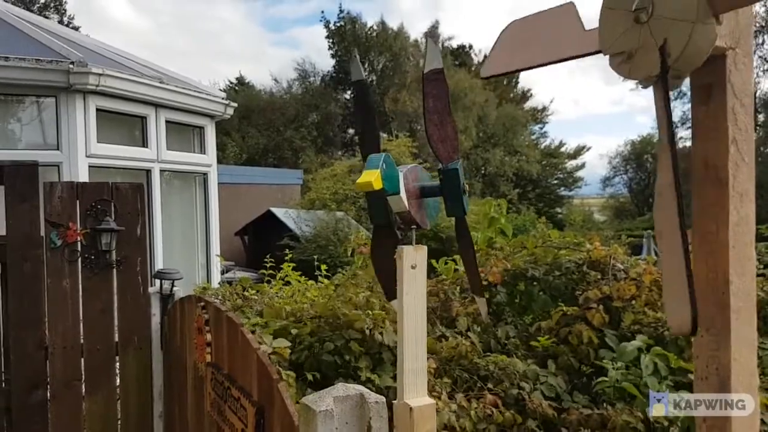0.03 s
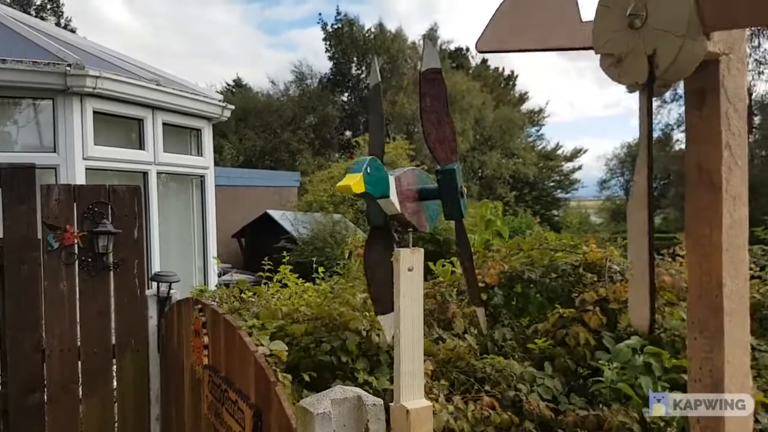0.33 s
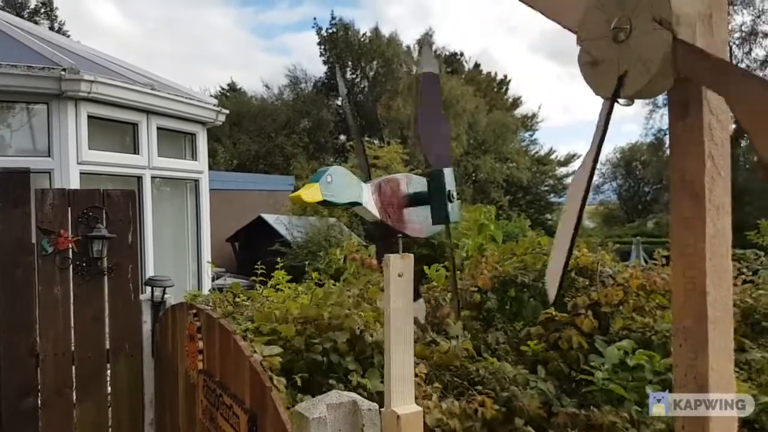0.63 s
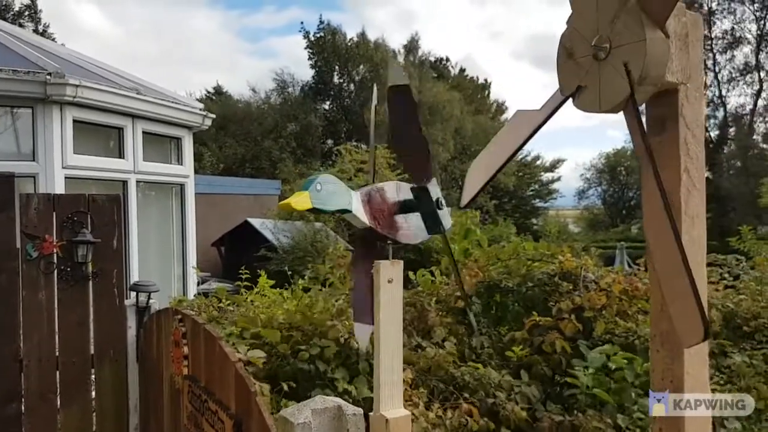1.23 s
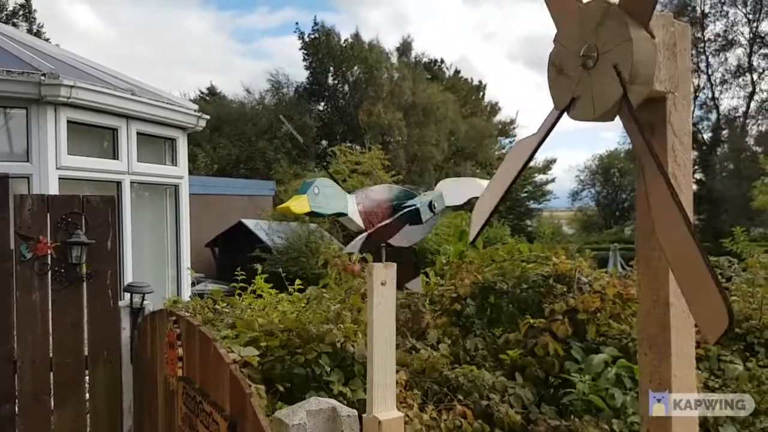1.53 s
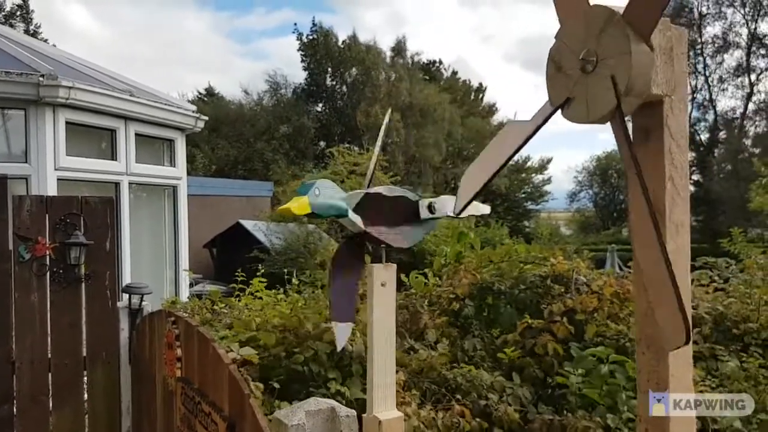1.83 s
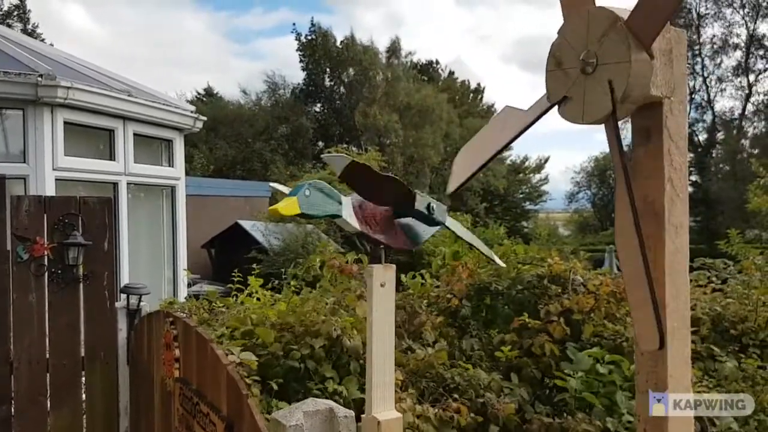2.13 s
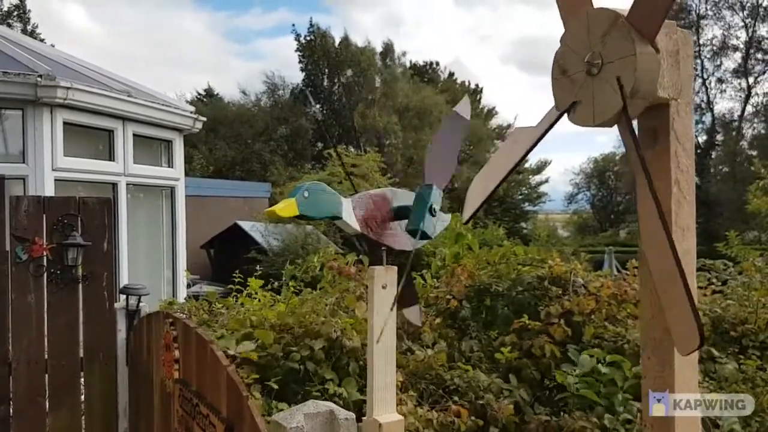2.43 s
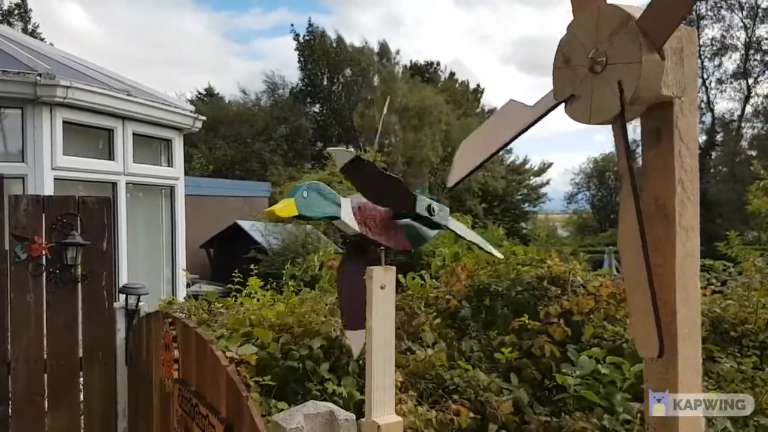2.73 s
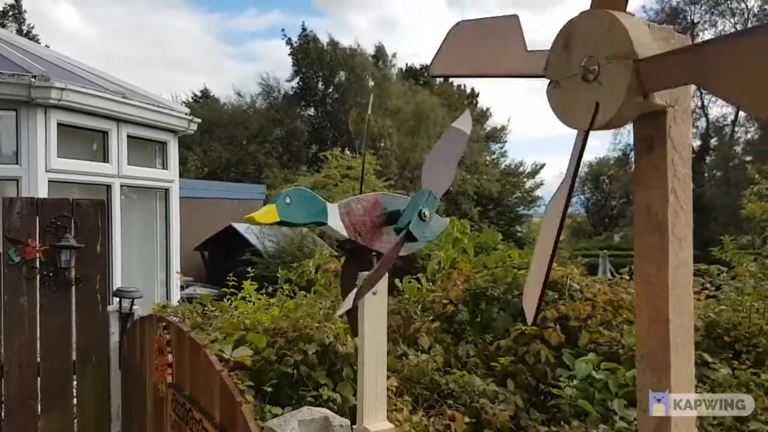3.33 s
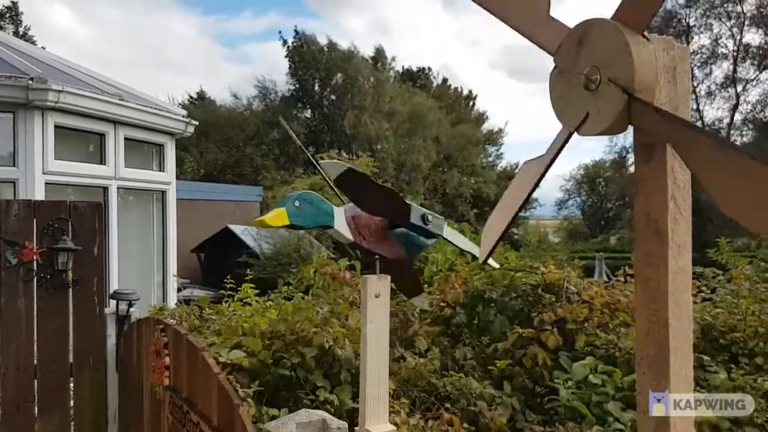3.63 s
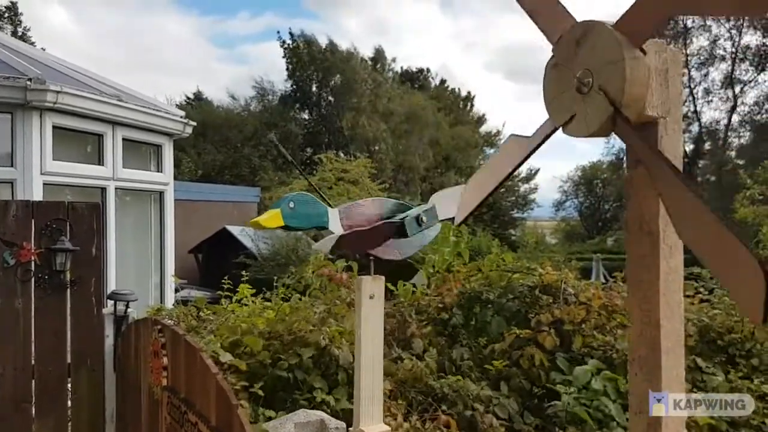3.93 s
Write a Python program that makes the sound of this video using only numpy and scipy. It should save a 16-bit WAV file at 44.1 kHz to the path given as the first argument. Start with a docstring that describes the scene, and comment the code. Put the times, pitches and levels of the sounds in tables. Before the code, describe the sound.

Wind hits an outdoor microphone with a low rumble, dull pops and short crackles, stronger on the left. It eases, gusts again and dies down, while garden leaves hiss quietly and a wooden ornament gives a few faint, uneven ticks.

```python
"""Gusty wind on a microphone

Wind in a garden buffets the two ports (sound openings) of a camera microphone, the left one more.
Each port rumbles and roars on its own, and the exposed left one also flutters and rasps. Single eddies
(swirls of air) thump and pop on both. Leaves hiss behind, and a spinning wooden ornament ticks faintly."""
import sys
import numpy as np
from scipy import signal
from scipy.fft import rfft, irfft, next_fast_len
from scipy.io import wavfile
from scipy.ndimage import map_coordinates

SR = 44100
rng = np.random.default_rng(int(sys.argv[2]) if len(sys.argv) > 2 else 0)


def master_out(mix):
    """Clip the mix to full scale and print it as 16-bit PCM to the path in sys.argv[1]."""
    frames = np.transpose(np.atleast_2d(mix))
    ceiling = np.clip(frames, -1, 1)
    pcm = np.round(ceiling * 32767).astype(np.int16)
    wavfile.write(sys.argv[1], SR, pcm)


N = 4 * SR


def amp(db):
    """Turn decibels into a gain."""
    return 10 ** (np.asarray(db) / 20)


def unit(x):
    """Scale a signal to an average (rms) size of 1."""
    return x / np.sqrt(np.mean(x ** 2) + 1e-20)


def along(points, hz):
    """Read between (pitch_hz, value) rows on a log scale."""
    pitches, values = np.transpose(points)
    return np.interp(np.log(hz + 1), np.log(pitches + 1), values)


def curve(rows):
    """Join (time_s, value) rows into one value per sample."""
    return np.interp(np.arange(N) / SR, *np.transpose(rows))


def wobble(rate_hz):
    """A smooth curve through rate_hz random values a second."""
    knots = rng.standard_normal(4096)
    return map_coordinates(knots, [np.arange(N) * rate_hz / SR], mode="wrap")


def filtered(x, response):
    """Scale each frequency in x by the gain response(hz)."""
    size = next_fast_len(N + SR // 2)
    return irfft(rfft(x, size) * response(np.fft.rfftfreq(size, 1 / SR)), size)[..., :N]


def turbulence(spectrum, lumpy_db, rate_hz):
    """Churning air: noise that comes in random lumps, shaped by a spectrum."""
    flow = rng.standard_normal(N) * amp(lumpy_db * np.tanh(wobble(rate_hz)))
    return unit(filtered(flow, lambda hz: amp(along(spectrum, hz))))


def burst(noise, centre_s, length_s):
    """A bell-shaped burst of noise, of average size 1 at its top."""
    bell = np.exp(-2 * ((np.arange(N) / SR - centre_s) / length_s) ** 2)
    return unit(noise * bell) * np.sqrt(np.mean(bell ** 2))


def foliage():
    """Leaves hiss all around, swelling slowly."""
    # swell of the hiss: time_s, relative_db
    swell = [(0.0, -62.5), (0.56, -60.5), (1.25, -61), (1.73, -63.5), (1.88, -62.5), (2.56, -63.5),
             (3.24, -62.5), (4.0, -63)]
    # tone of the hiss: pitch_hz, level_db
    tone = [(40, 2), (300, 5), (620, 10.5), (850, 7), (1250, 3.3), (1700, 1.6), (2700, .8), (3500, -3),
            (5000, -5.5), (7500, -9), (9200, -16.5), (11500, -14), (15500, -16)]
    # how alike the two ports hear it: pitch_hz, likeness (1 = the same)
    alike = [(200, .6), (1000, .2), (4000, .05), (6000, .35), (8000, .88), (11000, .98)]

    def split(hz):
        angle = np.arccos(np.clip(along(alike, hz), -1, 1)) / 2
        return amp(along(tone, hz)) * [np.cos(angle), np.sin(angle)]

    shared, opposite = filtered(rng.standard_normal((2, N)), split)
    hiss = unit(np.array([shared + opposite, shared - opposite]))
    return hiss * amp(curve(swell) + 11.0 + 0.59 * wobble(19))


def ornament(attack_s=0.001, scrape_fade_s=0.019):
    """Each knock of the ornament's hub rings the wood briefly, with a little scrape."""
    # knocks: start_s, level_db, scrape_db (compared with the ring)
    knocks = [(1.964, -33, -10), (2.232, -43, -8), (2.386, -45, 2), (2.864, -40.5, -8), (3.305, -40, -8),
              (3.416, -37, -12), (3.532, -45, -6), (3.65, -38, -7), (3.695, -42.5, 6.5)]
    # ringing tones of the wood: pitch_hz, level_db, fade_s (time to fall 60 dB)
    wood = [(1220, -3, .03), (1660, -5, .02), (2080, -5, .022), (2540, -1, .024), (3750, -12, .015)]
    out = np.zeros((2, N + SR))
    t = np.arange(SR // 5) / SR
    band = signal.butter(3, [900, 4200], "band", fs=SR)
    for start_s, knock_db, scrape_db in knocks:
        ring = np.zeros((2, len(t)))
        for hz, level_db, fade_s in wood:
            fade = amp(level_db + rng.normal(0, 1) - 60 * t / fade_s)
            ring += fade * np.sin(2 * np.pi * (hz * t + rng.random((2, 1))))
        scrape = unit(signal.lfilter(*band, rng.standard_normal((2, len(t)))))
        knock = ring + scrape * amp(scrape_db - 60 * t / scrape_fade_s)
        start = round(start_s * SR)
        out[:, start:start + len(t)] += amp(knock_db) * knock * (1 - np.exp(-t / attack_s))
    return out[:, :N]


def rasps():
    """Now and then the flow tears at the left port in a short, bright crackle."""
    # tears in the flow: centre_s, length_s, level_db
    tears = [(.063, .007, -34), (.326, .011, -34), (.59, .007, -41), (1.595, .006, -41), (1.935, .006, -40),
             (1.968, .005, -32), (2.068, .008, -37), (2.128, .016, -33), (2.175, .007, -39),
             (2.307, .004, -32), (2.322, .005, -34.5), (2.492, .005, -39), (2.685, .02, -35),
             (2.826, .012, -36.5), (2.967, .004, -30), (3.008, .004, -35), (3.028, .012, -34.5),
             (3.087, .005, -37), (3.354, .005, -42)]
    # tone of a rasp: pitch_hz, level_db
    tone = [(200, -7), (700, 1), (1500, 0), (2700, -3), (3500, -8.5), (4500, -19), (8000, -60)]
    air = turbulence(tone, lumpy_db=5, rate_hz=450)
    return sum(amp(db) * burst(air, centre_s, length_s) for centre_s, length_s, db in tears)


def flutter(spits_per_s=110, spit_s=0.004, scatter_db=2.5, rustle=0.058):
    """Tiny eddies spit at uneven intervals on the left port, over an unbroken rustle."""
    # strength of the flutter: time_s, relative_db
    strength = [(0, -33.5), (.12, -37), (.18, -50), (.3, -41.5), (.38, -62), (.48, -54), (.515, -44),
                (.6, -44), (.7, -60), (1.2, -59), (1.3, -45.5), (1.38, -55), (1.46, -46.5), (1.68, -43),
                (1.92, -43), (2.01, -52), (2.1, -46), (2.42, -45.5), (2.65, -37.5), (2.74, -43.5),
                (2.84, -41), (3.01, -38), (3.09, -43), (3.15, -57), (3.26, -53), (3.335, -45), (3.39, -51),
                (3.6, -55), (3.75, -66), (4, -51.5)]
    # tone of the flutter: pitch_hz, level_db
    tone = [(150, -1), (500, 3), (900, 1.5), (1500, .5), (2100, -4), (2650, -10.5), (3300, -32),
            (8000, -71)]
    chance = rng.random((800, 4))
    gaps_s = -np.log(chance[:, 1:]).mean(axis=1) / spits_per_s
    sizes = amp(scatter_db * (2 * chance[:, 0] - 1))
    kicks = np.bincount((np.cumsum(gaps_s) * SR).astype(int), sizes, N)[:N]
    age = np.arange(SR // 20) / SR / spit_s
    spit_shape = (1 - np.exp(-10 * age)) * np.exp(-age)
    spits = unit(signal.fftconvolve(kicks, spit_shape)[:N])
    air = turbulence(tone, lumpy_db=5.5, rate_hz=700)
    return amp(curve(strength) + 0.5) * unit(rustle + spits) * air


def thumps(length_s=0.011):
    """Single eddies give short, dull blows, different at each port."""
    # blows and their relative levels: centre_s, left_db, right_db
    blows = [(0.054, -20.5, -34), (0.329, -24, -31.5), (0.629, -33.5, -58), (1, -32, -43),
             (1.179, -28.5, -28), (1.3, -32, -28.5), (1.331, -27, -57), (1.495, -32, -34),
             (1.558, -27, -25), (1.642, -39, -35), (1.816, -33.5, -32), (1.934, -23, -54),
             (2.063, -27, -34), (2.113, -24.5, -48), (2.211, -27, -36), (2.309, -24, -46),
             (2.601, -19.5, -27), (2.663, -16, -47), (2.841, -24, -29), (3.008, -21.5, -31),
             (3.116, -26.5, -32), (3.278, -30, -32), (3.54, -31.5, -36), (3.637, -34, -42),
             (3.706, -39, -42), (3.838, -41.5, -47), (3.909, -46, -40), (3.967, -58, -41.5)]
    # tone of a thump: pitch_hz, level_db
    tone = [(30, -32), (100, 5.5), (170, 3.5), (350, 4.5), (520, -7), (800, -18), (4000, -97)]
    out = np.zeros((2, N))
    for port in range(2):
        air = turbulence(tone, lumpy_db=-7, rate_hz=200)
        for centre_s, *levels_db in blows:
            out[port] += amp(levels_db[port] + 0.5) * burst(air, centre_s, length_s)
    return out


def pops(spread_s=0.00058):
    """Each jolt gives a pressure spike at each port, up or down at each independently, the two arriving a
    moment apart."""
    # pressure jolts: time_s, left_peak_db, right_peak_db
    jolts = [(0.023, -12, -12), (0.112, -5, -9.5), (0.288, -16.5, -31), (0.385, -27.5, -40),
             (0.48, -33, -42), (1.192, -38, -34), (1.295, -15.5, -21), (1.49, -21.5, -37),
             (1.561, -22, -29), (1.686, -21, -50), (1.908, -19, -43), (2.107, -24, -38), (2.605, -13, -27),
             (2.653, -11, -17), (2.837, -17.5, -30), (3.203, -23, -31), (3.241, -33, -20.5),
             (3.334, -18, -38), (3.355, -26, -40), (3.511, -26, -41), (3.568, -31, -36), (3.585, -24, -47),
             (3.939, -33, -24)]
    # tone of a pop: pitch_hz, level_db
    tone = [(40, -41), (200, -14.5), (400, 1), (750, -3.5), (1100, -12), (1800, -28.5), (2600, -57),
            (5000, -69), (10000, -100)]
    kicks = np.zeros((2, N))
    for time_s, *peaks_db in jolts:
        for port in range(2):
            spike = amp(peaks_db[port]) * rng.choice([-1, 1])
            arrival_s = time_s + spread_s * rng.uniform(-1, 1)
            kicks[port, round(arrival_s * SR)] = spike
    return filtered(kicks, lambda hz: amp(along(tone, hz)) / amp(along(tone, hz)).mean())


def buffeting(force, body_db, rumble_db, breeze_db=-32):
    """Wind on one port: the same eddies chop a rumble and a dull body; hard gusts add a roar."""
    # large, slow eddies around the whole camera: time_s, relative_db
    slow_eddies = [(0, -41), (.14, -39), (.22, -54), (.31, -38), (.45, -41), (.66, -43), (.76, -49),
                   (1.04, -43), (1.6, -39.5), (2.45, -37.5), (2.6, -37), (2.9, -37.5), (3.02, -33.5),
                   (3.15, -38.5), (3.52, -40.5), (3.705, -50), (3.725, -72), (3.765, -70), (3.785, -52),
                   (3.85, -52), (3.885, -64), (3.91, -50), (4, -47)]
    # tones of the three layers: pitch_hz, level_db
    rumble_tone = [(20, -25), (40, -10.5), (75, -3), (125, -2.5), (190, -5.5), (300, -13.5), (600, -28),
                   (2400, -100)]
    body_tone = [(40, -14), (130, -5), (220, -5.5), (350, 0.5), (450, -5), (620, -16.5), (850, -22),
                 (1300, -34.5), (5000, -103)]
    roar_tone = [(100, -30), (280, 0), (400, 1), (540, 2), (650, -2), (780, -1), (1000, -9.5),
                 (1400, -17.5), (2000, -31), (3500, -63), (9000, -100)]
    gust_db = curve(force) - breeze_db
    chop = unit(amp(4.2 * np.tanh(wobble(60))))
    rumble = amp(curve(slow_eddies) + rumble_db) * turbulence(rumble_tone, lumpy_db=6.5, rate_hz=35)
    body = amp(body_db + 0.91 * gust_db) * turbulence(body_tone, lumpy_db=6.0, rate_hz=130)
    # in a gust the roar gains about twice as many decibels as the body
    roar = amp(-15.5 + 1.95 * gust_db) * turbulence(roar_tone, lumpy_db=4.5, rate_hz=210)
    return chop * rumble + amp(breeze_db) * (chop * body + roar)


def scene():
    """Wind on each port, over the sounds of the garden."""
    # force of the wind on each port: time_s, level_db
    left_force = [(0, -22.5), (.02, -20), (.14, -20.5), (.17, -26), (.235, -42), (.258, -23.5),
                  (.29, -21.8), (.36, -31), (.45, -32), (.64, -32), (.71, -46.5), (.96, -47.5), (1.04, -40),
                  (1.26, -36), (1.3, -28), (1.37, -42), (1.55, -31.5), (1.63, -37), (1.94, -32.5),
                  (2.01, -41), (2.06, -32), (2.3, -30.5), (2.48, -32), (2.64, -23.5), (2.73, -30.5),
                  (2.94, -28.5), (3.0, -22.5), (3.11, -32), (3.52, -34.5), (3.72, -56), (4, -69)]
    right_force = [(0, -24), (.02, -22), (.135, -21), (.155, -29.5), (.235, -52), (.272, -21), (.3, -21),
                   (.33, -42), (.46, -44), (.485, -29), (.51, -49.5), (1.14, -53), (1.18, -34), (1.25, -45),
                   (1.295, -31), (1.35, -53), (1.63, -52), (2.02, -62.5), (2.08, -45), (2.48, -46),
                   (2.65, -31), (2.75, -45), (3.0, -34), (3.05, -46), (3.53, -42.5), (3.6, -71), (4, -62)]
    left = buffeting(left_force, body_db=-2, rumble_db=5.0) + flutter() + rasps()
    right = buffeting(right_force, body_db=-1.5, rumble_db=2.0)
    wind = np.array([left, right]) + thumps() + pops()
    lean_left = amp([[.25], [-.25]])
    return wind + foliage() * lean_left + ornament()


def record(dry):
    """The camera keeps nothing above 15750 Hz."""
    return filtered(dry, lambda hz: hz < 15750)


dry = scene()
out = record(dry)
master_out(out)
```